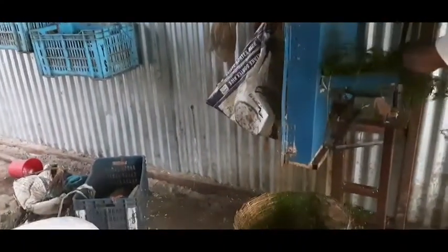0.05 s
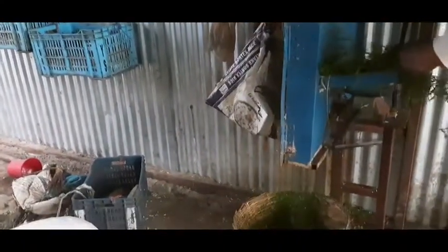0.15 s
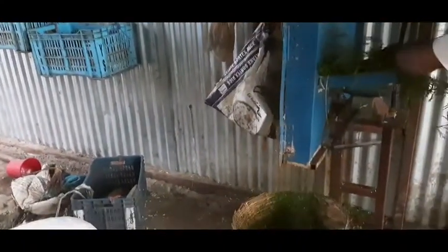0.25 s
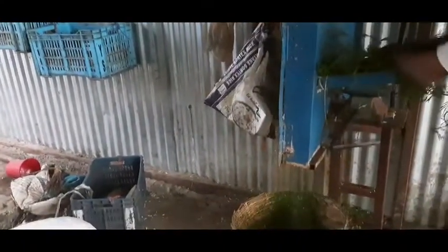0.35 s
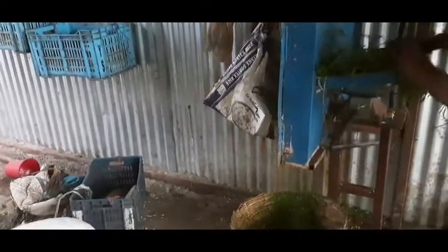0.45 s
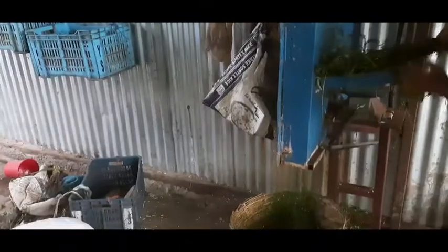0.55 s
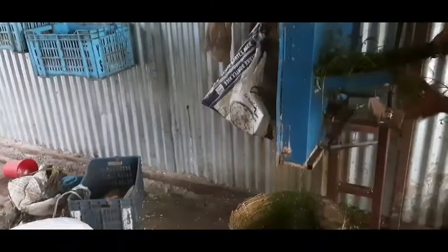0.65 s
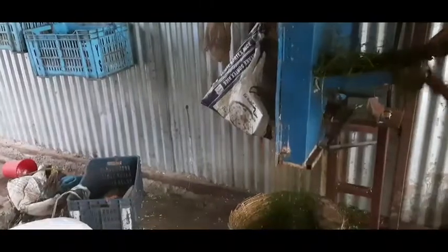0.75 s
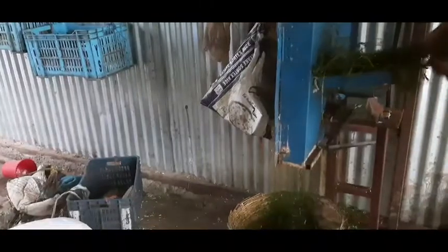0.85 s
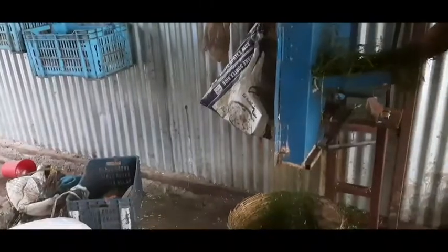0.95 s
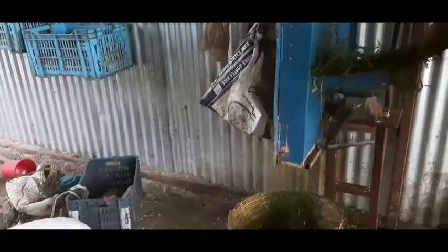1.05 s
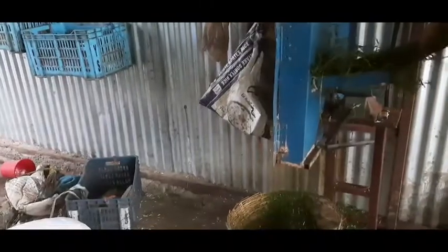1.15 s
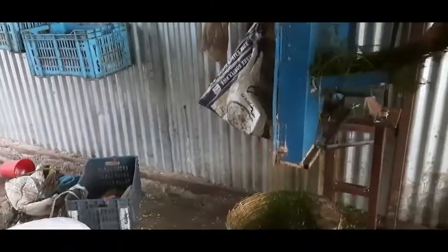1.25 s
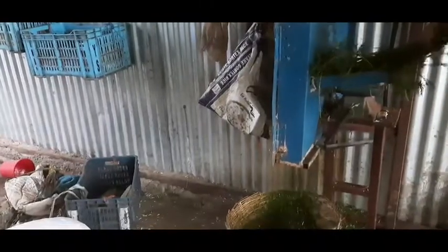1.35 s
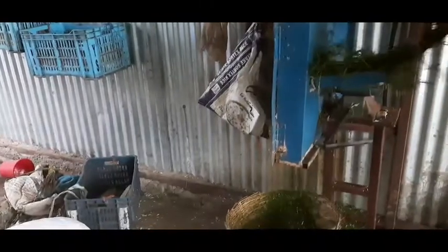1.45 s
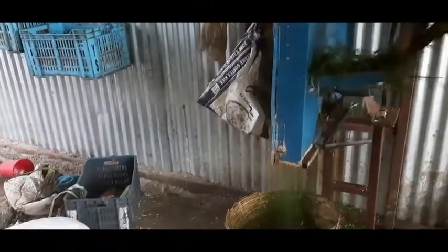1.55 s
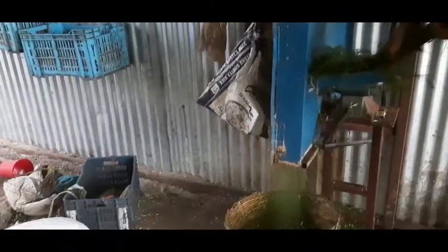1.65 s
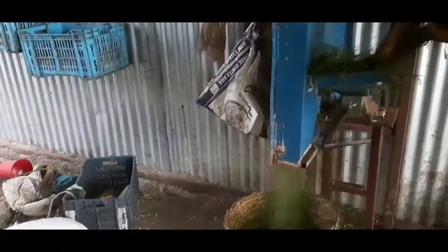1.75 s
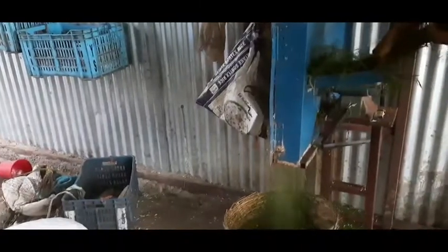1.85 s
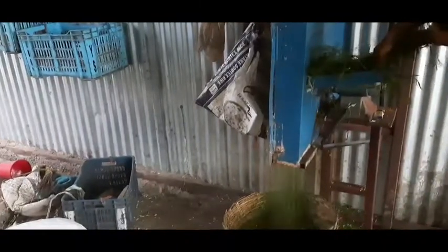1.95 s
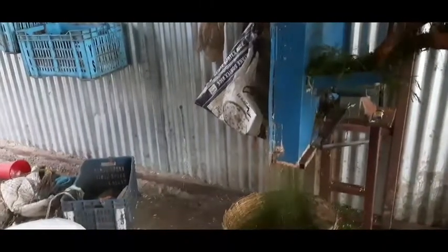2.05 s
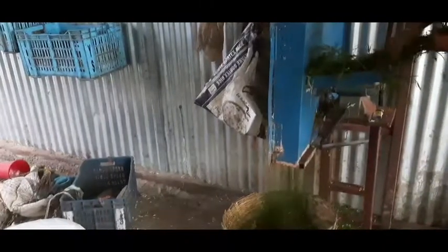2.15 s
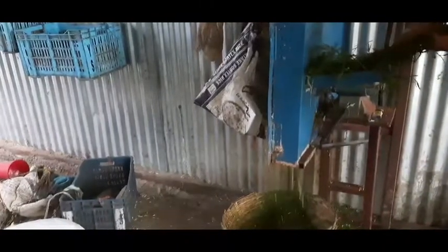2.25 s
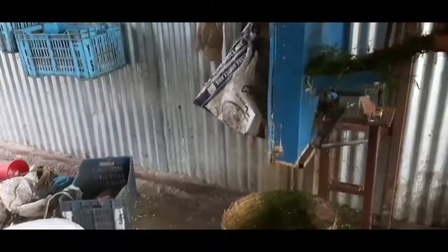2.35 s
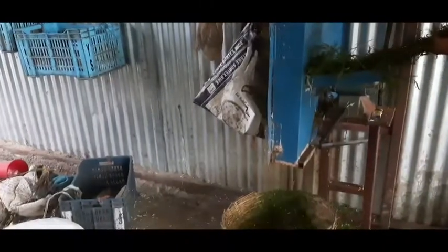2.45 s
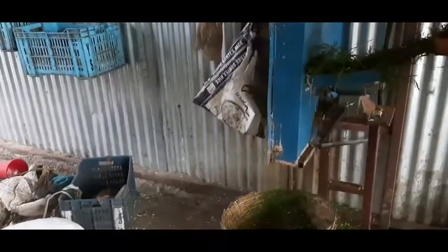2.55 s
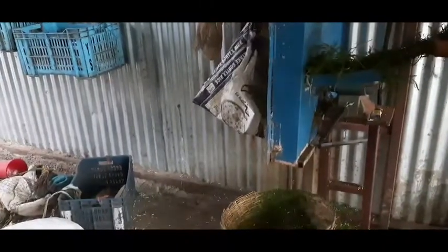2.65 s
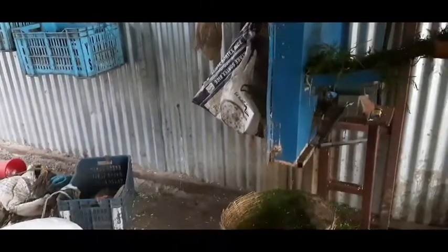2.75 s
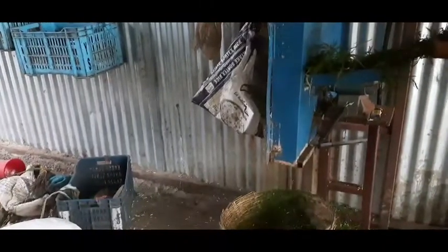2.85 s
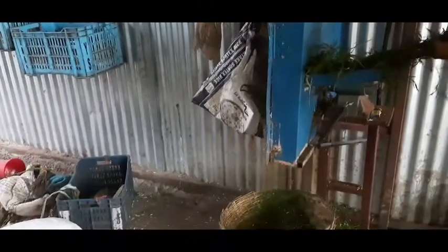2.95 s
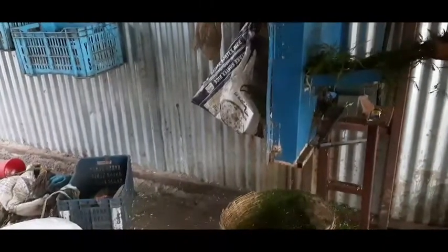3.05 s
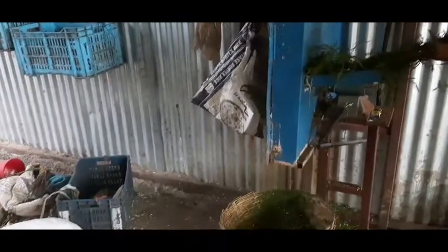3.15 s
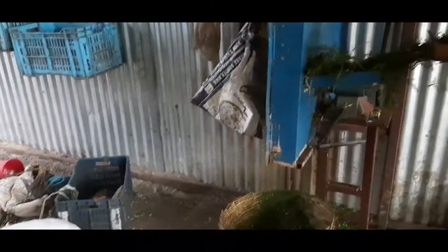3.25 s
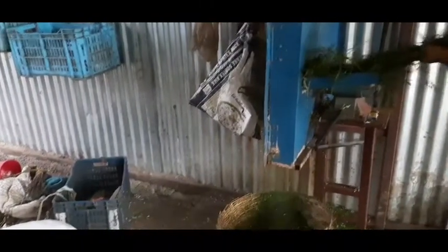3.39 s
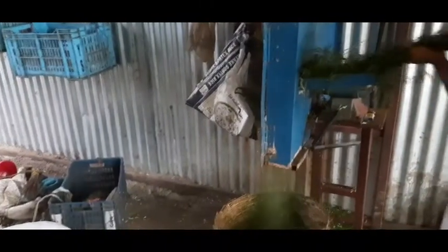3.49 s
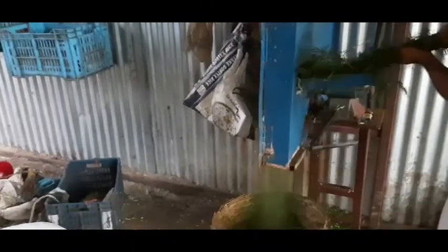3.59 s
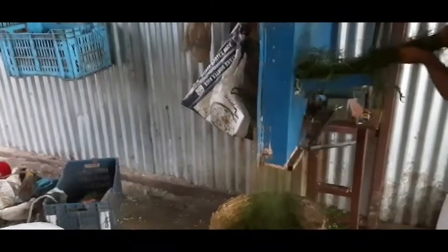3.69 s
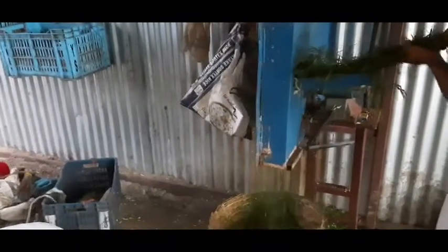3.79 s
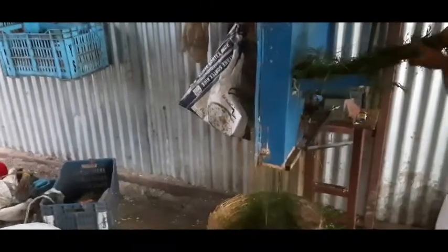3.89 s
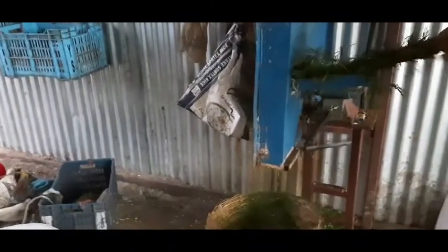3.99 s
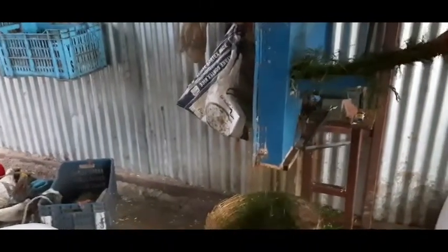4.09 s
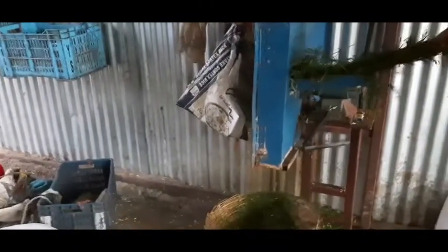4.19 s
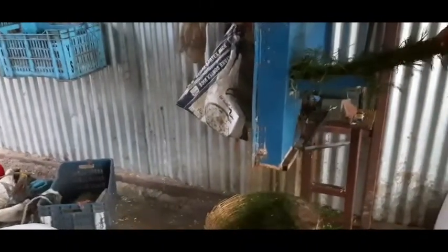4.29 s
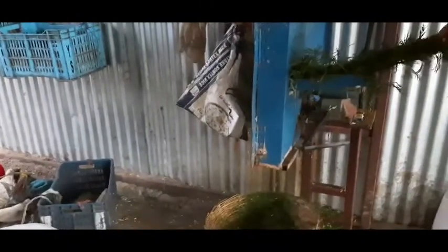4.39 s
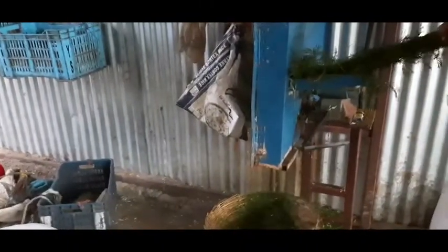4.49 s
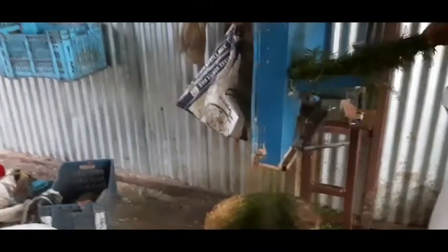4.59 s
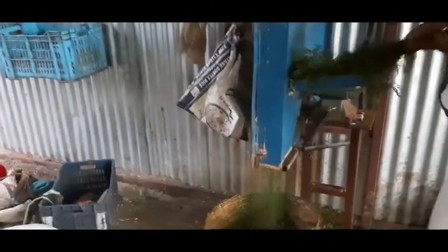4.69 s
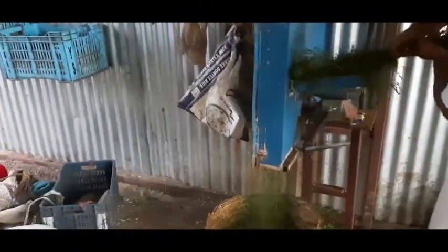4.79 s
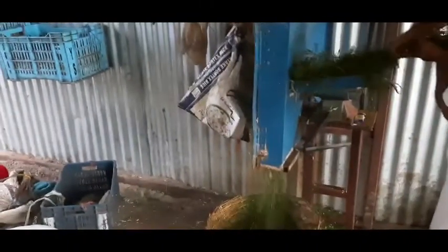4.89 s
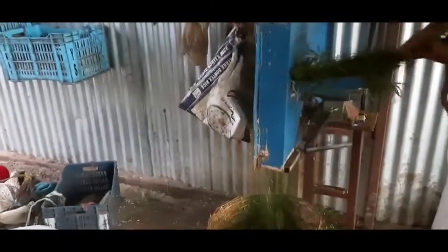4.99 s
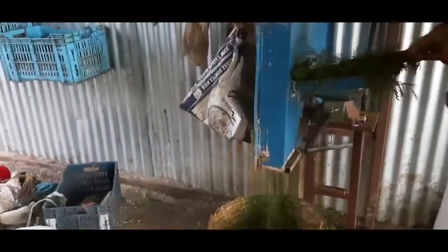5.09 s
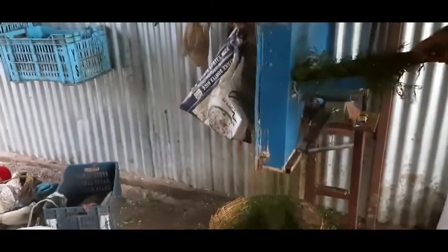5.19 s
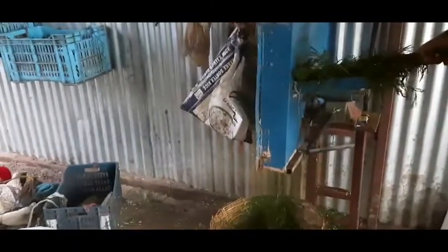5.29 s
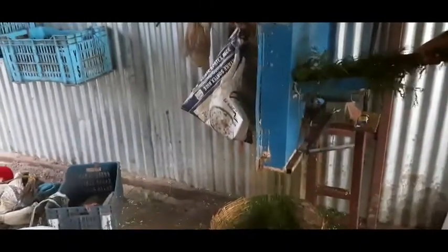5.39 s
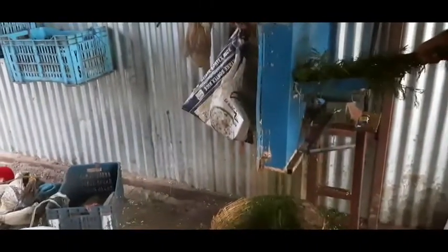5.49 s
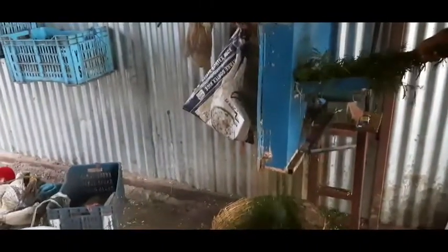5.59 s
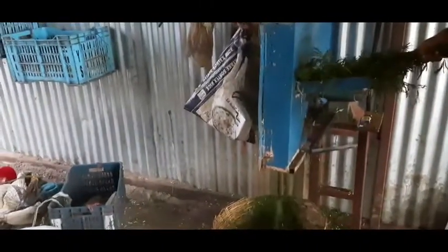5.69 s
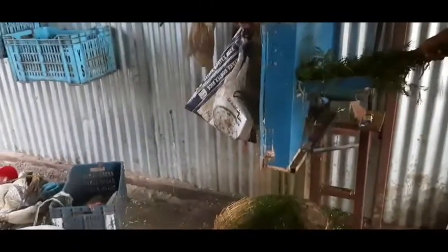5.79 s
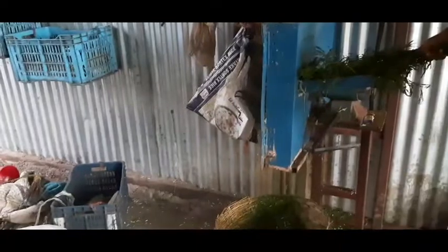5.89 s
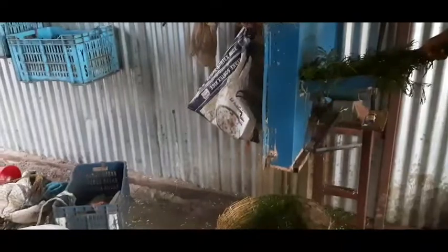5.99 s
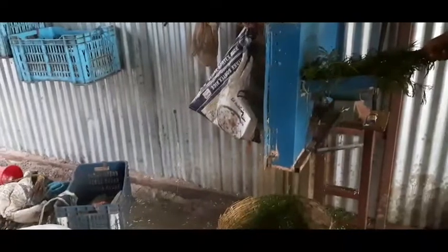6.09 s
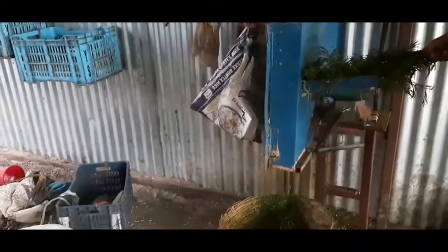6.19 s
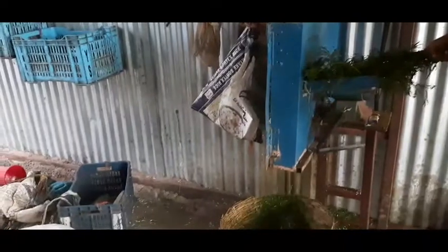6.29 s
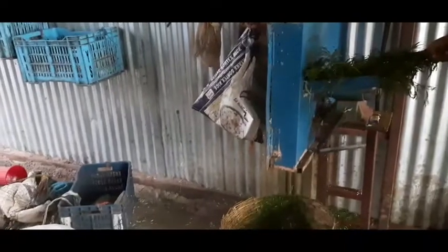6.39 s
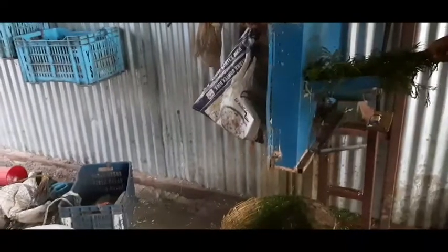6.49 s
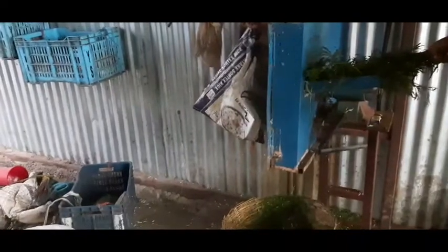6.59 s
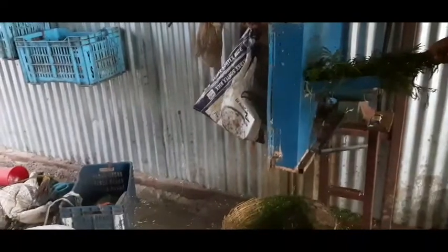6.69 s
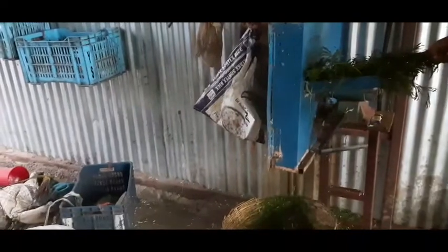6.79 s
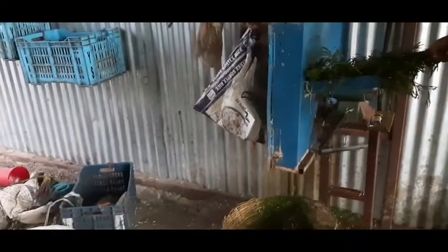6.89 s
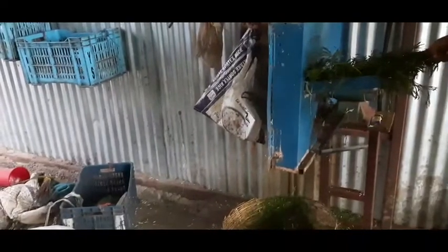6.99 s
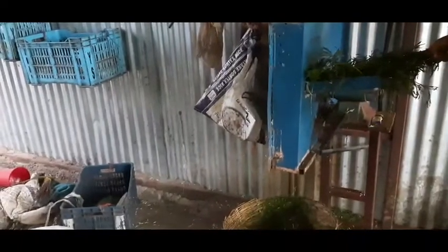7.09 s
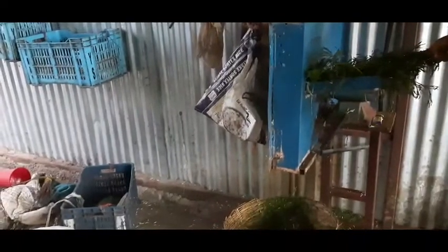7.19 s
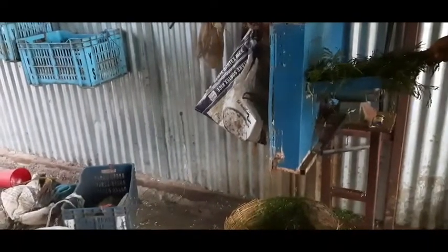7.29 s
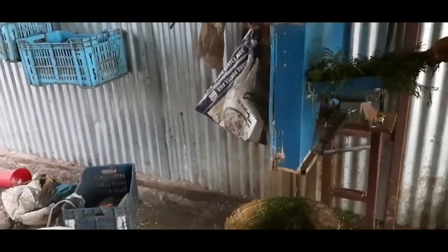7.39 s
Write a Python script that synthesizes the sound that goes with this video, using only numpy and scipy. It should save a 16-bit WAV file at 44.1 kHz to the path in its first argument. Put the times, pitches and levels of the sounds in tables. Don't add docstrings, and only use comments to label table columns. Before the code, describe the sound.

A small electric fodder chopper runs close to a stereo microphone in a reverberant sheet-metal shed. From 0 to 1 s a fast buzzing hum carries dense stalk crackle, metallic clatter and sharp snaps near 0.6 and 0.9. The fan whine comes forward around 1.2, then bites at 1.5-2 drag the pitch down, with low air buffets on the right near 1.7. The rotor recovers from 2.2 to 3.3, whining upward with light grazing ticks and a burst near 2.8. Heavy cracks and knocks at 3.3-3.6 pull it down again; it climbs quietly until 4.55. Another hard bite at 4.6-4.9 makes it sag into rough, slowing chops, nearly stalling about 5.5 with small snaps and faint steel pings to 5.7. From 5.8 it slowly spins up, quiet at first; by 6.7-7.45 hum and fan whine swell, with small ticks.

```python
import sys
import numpy as np
from scipy import signal
from scipy.fft import rfft, irfft, next_fast_len
from scipy.io import wavfile
from scipy.ndimage import uniform_filter1d, map_coordinates

SR = 44100
rng = np.random.default_rng(int(sys.argv[2]) if len(sys.argv) > 2 else 0)


def ratio_of_db(decibels):
    return 10 ** (np.asarray(decibels, float) / 20)


def store_pcm(level_fs):
    pcm = np.round(np.clip(level_fs, -1, 1) * 32767).astype(np.int16)
    wavfile.write(sys.argv[1], SR, np.atleast_2d(pcm).T)


N = 328411
TICK = 64


def unit(x):
    return x / np.sqrt(np.mean(x ** 2) + 1e-20)


def noise():
    return rng.standard_normal((2, N))


def ticks():
    return np.arange(0, N + TICK, step=TICK) / SR


def full(control):
    return np.interp(np.arange(N) / SR, ticks(), control)


def curves(rows):
    seconds, *columns = np.transpose(rows)
    return [np.interp(ticks(), seconds, column) for column in columns]


def wobble(rate):
    knots = rng.standard_normal(int(N * rate / SR) + 4)
    return np.interp(ticks() * rate, np.arange(len(knots)), knots)


def along(points, hz):
    f, values = np.transpose(points)
    return np.interp(np.log(hz + 1), np.log(f + 1), values)


def filtered(x, response):
    m = next_fast_len(x.shape[-1] + SR // 2)
    spectrum = rfft(x, m) * response(np.fft.rfftfreq(m, 1 / SR))
    return irfft(spectrum, m)[..., :x.shape[-1]]


def ringing(modes, hz):
    total = 0
    for k, (centre, width, db) in enumerate(modes):
        damping = 1j * hz * width
        total = total + (-1) ** k * ratio_of_db(db) * damping / (centre ** 2 - hz ** 2 + damping)
    return total


def power_sum(*levels_db):
    return 10 * np.log10(sum(ratio_of_db(2 * db) for db in levels_db))


def surges(rows, rise):
    t = ticks()
    levels_db = []
    for s, hold, db, fade in rows:
        rising = rise * np.maximum(s - t, 0)
        fading = fade * np.maximum(t - s - hold, 0)
        levels_db.append(db - rising - fading)
    return power_sum(*levels_db, -200)


# time in seconds, shaft speed in turns per second.
SHAFT_SPEED = [(0.0, 47.8), (0.77, 45.6), (1.02, 45.0), (1.48, 46.9), (1.62, 44.6), (1.92, 35.7),
               (2.34, 39.9), (2.74, 43.3), (3.3, 46.4), (3.4, 44.6), (3.76, 32.0), (4.55, 40.8),
               (4.64, 38.2), (5.0, 24.8), (5.51, 14.8), (5.78, 17.4), (6.7, 25.6), (7.45, 33.3)]


def shaft_speed():
    return curves(SHAFT_SPEED)[0]


# time in seconds, hum in dB, rotor rocking in dB, blade mismatch in dB, frame shudder in dB,
# cage buzz in dB, upper hum in dB.
MOTOR_EFFORT = [(0, -36.5, 2.5, 2, -5, -9, -2), (.3, -34, -5.5, 0, 7, 3.5, -1),
                (.95, -33.5, 8.5, 4.5, -2.5, 0.5, 2.5), (1.3, -39.5, -0.5, -3, -10, -2, -0.5),
                (2.12, -47.5, 2.5, 3.5, -3, -2.5, 0.5), (2.45, -46.5, 4, -4, -2, -0.5, 2.5),
                (2.74, -45, 3, -2, 2.5, -8, 0.5), (2.9, -38.5, -1, 2, -9, 0, 0.5),
                (3.11, -42, -4, -3, -12, -7, -2), (3.3, -38.5, -1.5, -3.5, -24, -1, 0),
                (3.98, -56, 11, 5, -7, 2, 0.5), (4.17, -48.5, 10, -3, 3, 5.5, -2),
                (4.45, -49.5, 4, -6.5, 4, 1.5, 2), (5.58, -59, -9, 10.5, -3, -1, 1),
                (6.04, -59, 6, 7.5, 5, -2, -2.5), (6.62, -48.5, 8, -0.5, 1, 0, -1),
                (7.05, -38, 9.5, -0.5, -1.5, -1.5, -2), (7.45, -35.5, 3, 0, -9, 2.5, -3)]


def motor_effort():
    return curves(MOTOR_EFFORT)


def drag():
    speed = shaft_speed()
    lag_s = 0.15
    keep = np.exp(-TICK / (lag_s * SR))
    slowing = np.maximum(-np.gradient(speed, ticks()) - 5, 0)
    braking = signal.lfilter([1 - keep], [1, -keep], slowing)
    labouring = np.maximum(30 - speed, 0) / 19
    return full(np.clip(0.045 + 0.038 * braking + labouring, 0, 0.8))


def blade_gate(turns, life_s, steady, scatter_db, weak_db):
    passes = (2 * turns).astype(int)
    since_s = (2 * turns - passes) / (2 * full(shaft_speed()))
    scatter = np.clip(rng.standard_normal(N // 100), -2, 1.6)
    second_blade = np.arange(N // 100) % 2
    size_db = scatter_db * scatter + weak_db * second_blade
    return steady + ratio_of_db(size_db)[passes] * np.exp(-since_s / life_s)


# time of full level in seconds, hold in seconds, crackle in dB, fade in dB per second,
# sheet-metal clatter against the crackle in dB.
BITES = [(0, 0.071, -43, 92, -4), (0.1, 0.61, -46, 100, 3.5), (0.404, 0.034, -43, 200, 3),
         (0.56, 0.12, -46, 56, 8), (0.787, 0.046, -41, 81, 5), (0.938, 0.037, -41, 83, 7.5),
         (1.276, 0.048, -54.5, 150, 2.5), (1.499, 0.025, -38, 50, 3.5), (1.633, 0.1, -40, 64, -1.5),
         (1.821, 0.028, -39.5, 153, 8), (2.03, 0.087, -49, 197, 5), (2.19, 1.6, -57.5, 100, -10),
         (2.806, 0.083, -52.5, 112, 2.5), (3.349, 0.13, -41, 73, 4), (3.555, 0.078, -42, 185, 9),
         (4.621, 0.15, -40, 80, 9), (4.846, 0.04, -46.5, 128, 5), (4.93, 0.026, -55.5, 64, -11),
         (5.05, .1, -67, 100, -10), (5.584, 0.027, -74.5, 100, 0), (5.139, .01, -60, 240, 14.5),
         (5.242, .01, -54, 120, -10), (5.295, 0.053, -59, 308, 2), (5.676, 0.012, -61, 103, 4),
         (6.667, 0.34, -66, 30, 6.5), (1.046, 0.04, -56, 97, 16.5)]


def feed(extra_db):
    rows = []
    for (s, hold, db, fade, _), more in zip(BITES, extra_db):
        rows.append((s, hold, db + more, fade))
    loose_chaff_db = motor_effort()[0] - 25.5
    return power_sum(surges(rows, 367), loose_chaff_db)


# frequency in Hz, width in Hz, level in dB.
HOUSING = [(79.2, 17.2, -5.5), (127, 12, -9.5), (178.1, 11.5, -0.5), (214.3, 8, -8), (254, 26, -2),
           (302, 27, -4.5), (358.1, 20.2, 3), (401.7, 26.7, 2), (467, 43, -1.5), (643, 37, -2),
           (700, 42, -1.5), (866, 36, -2.5), (1030, 40, -6)]


def housing(hz):
    return ringing(HOUSING, hz)


# frequency in Hz, width in Hz, level in dB.
SHEET = [(1024, 44, -3), (1252, 180, -9.5), (1483, 164, -2), (1557, 30, 6.5), (1794, 60, -1),
         (1876, 17, 1.5), (2250, 28, -5), (2496, 20.4, 1)]


def sheet_metal(hz):
    return ringing(SHEET, hz)


# frequency in Hz, time to fade by 60 dB in seconds.
SHED_FADE = [(200, 0.56), (2000, 0.42), (8000, 0.17), (16000, 0.037)]


def shed(pair, wet_db):
    hz, t, z = signal.stft(pair[0], SR, nperseg=256)
    keep = ratio_of_db(-120 * t[1] / along(SHED_FADE, hz))
    power = np.array([signal.lfilter([0, 1 - k], [1, -k], p) for k, p in zip(keep, np.abs(z) ** 2)])
    fresh = signal.stft(rng.standard_normal(pair.shape), SR, nperseg=256)[2]
    lingering = unit(np.abs(fresh)) * np.exp(1j * np.angle(fresh)) * np.sqrt(power)
    tail = signal.istft(lingering, SR, nperseg=256)[1]
    return (pair + ratio_of_db(wet_db) * tail[:, :N]) / np.sqrt(1 + ratio_of_db(2 * wet_db))


# frequency in Hz, level in dB.
ROOM_TONE = [(1500, -30), (2500, 2), (5800, -4), (7200, 3), (8200, -21), (15000, -3.5)]


def room_tone():
    return ratio_of_db(-78.0) * unit(filtered(noise(), lambda hz: ratio_of_db(along(ROOM_TONE, hz))))


# time of full level in seconds, hold in seconds, buffet in dB, fade in dB per second.
PUFFS = [(0, 0.0075, -66, 250), (.5, .01, -75, 130), (.89, 0.16, -74, 70), (1.66, .02, -42.5, 140),
         (1.79, 0.012, -45.5, 260), (3.36, .03, -51, 100), (3.45, .02, -43.5, 122), (3.56, .01, -56, 450),
         (3.85, .6, -76, 40), (4.62, .01, -66, 120), (4.85, .08, -66, 150), (5.8, .2, -79, 40),
         (6.95, .15, -67, 50), (7.4, .05, -70, 50)]
# frequency in Hz, level in dB per Hz.
BUFFET_TONE = [(13, -48), (22, -30), (41, -21), (59, -2), (100, -7), (140, -10), (180, -27), (310, -120)]


def gusts():
    buffet = unit(filtered(noise(), lambda hz: ratio_of_db(along(BUFFET_TONE, hz))))
    draught_db = motor_effort()[0] - 42 + 4 * wobble(9.8)
    still_air_db = -83
    level_db = power_sum(surges(PUFFS, 450), draught_db, still_air_db)
    left_right_db = np.array([[-7], [4.5]])
    return full(ratio_of_db(level_db)) * ratio_of_db(left_right_db) * buffet


# time in seconds, level in dB.
FAN_LEVEL = [(0, -63), (1.2, -51), (1.45, -52), (2.2, -64), (2.5, -56), (3, -56.5), (3.3, -49.5),
             (3.85, -65), (4.2, -58), (4.55, -56), (5.3, -83), (5.9, -90.5), (6.3, -77), (6.7, -63),
             (7, -54), (7.12, -50.5), (7.25, -49.5), (7.45, -48)]
# cycles per shaft turn, level in dB.
VANES = [(25, -23), (40, -19), (60, -15.5), (80, -4), (108, -3.5), (114, -16), (125, -16), (160, -120)]
# frequency in Hz, level in dB.
COWL = [(500, -6), (1200, 3.5), (1600, 8.5), (2100, 0), (2700, 4), (3300, -3.5), (4500, -2), (6000, 7.5)]


def fan(turns):
    steps = 1024
    count = next_fast_len(int(turns[-1] * steps) + steps)
    order = np.fft.rfftfreq(count, 1 / steps)
    air = irfft(rfft(rng.standard_normal((2, count))) * ratio_of_db(along(VANES, order)), count)
    pair = np.array([map_coordinates(channel, [turns * steps], order=1) for channel in air])
    pair = unit(pair * (1 + 0.054 * np.sin(2 * np.pi * turns)))
    level_db = curves(FAN_LEVEL)[0] + wobble(11)
    return full(ratio_of_db(level_db)) * filtered(pair, lambda hz: ratio_of_db(along(COWL, hz)))


# time in seconds, level in dB.
CLINKS = [
    (5.5815, -68),
    (5.7122, -63),
]
# frequency in Hz, level in dB, time to fade by 60 dB in seconds.
STEEL_PIN = [(2480, -4, 0.22), (3600, -5, .2), (4662, -6, .2), (5840, 4, .2), (7305, -6, .15),
             (8629, -6, .12)]


def clinks():
    out = np.zeros(N + SR)
    t = np.arange(SR // 4) / SR
    for s, db in CLINKS:
        start = round(s * SR)
        for hz, level_db, t60 in STEEL_PIN:
            waver_db = 3.0 * wobble(40)[:len(t) // TICK + 1].repeat(TICK)[:len(t)]
            tone_db = db + level_db + rng.normal(0, 2) - 60 * t / t60 + waver_db
            out[start:start + len(t)] += ratio_of_db(tone_db) * np.sin(2 * np.pi * hz * t)
    return out[:N] * [[1], [0.6]]


def clatter(turns):
    level_db = feed([row[-1] for row in BITES])
    level_db = uniform_filter1d(level_db, size=SR // 28 // TICK)
    passes = np.arange(1, int(2 * turns[-1]))
    second_blade = passes % 2
    at = np.interp(passes / 2 + 0.012 * second_blade, turns, np.arange(N))
    at = at + 0.6 * rng.standard_normal(len(passes))
    size = ratio_of_db(1.3 * rng.standard_normal(len(passes)) - 6 * second_blade)
    whole, part = at.astype(int), at % 1
    blows = np.bincount(whole, size * (1 - part), N + 2)
    blows = blows + np.bincount(whole + 1, size * part, N + 2)

    def panels(hz):
        return sheet_metal(hz) * hz ** 4 / (hz ** 4 + 440.0 ** 4)

    regular = unit(filtered(blows[:N], panels)) * [[1], [0.6]]
    tearing = unit(filtered(blade_gate(turns, 0.0092, 0.21, 2.0, -0.81) * noise(), panels))
    share = np.clip(0.04 + drag(), 0, 1)
    return full(ratio_of_db(level_db - 5.0)) * (np.sqrt(1 - share) * regular + np.sqrt(share) * tearing)


# time in seconds, peak in dB, knock against the peak in dB.
SNAPS = [(0.6035, -34, -7), (0.626, -24, -4), (0.912, -23.5, -19), (0.9345, -26.5, -11),
         (1.479, -22.5, -13), (1.996, -32, 0), (2.1698, -33.5, -14), (2.8787, -31.5, -8), (3.2998, -27, -6),
         (3.321, -25, 3), (3.51, -21, -8), (4.547, -38, -4), (4.572, -26, 7), (4.5984, -25, -11),
         (4.8703, -23, 7), (5.13, -38, 1), (5.233, -27, 0.5), (5.656, -34, 4), (5.7132, -42, -4),
         (6.1609, -59, -10), (4.535, -52, -10), (6.3759, -55, -6), (6.5595, -52, -6), (7.012, -50, -1),
         (7.0454, -53, -1), (7.0825, -50, -6), (7.1167, -59, -6), (7.1771, -61, -8), (7.2669, -55, -3),
         (7.3367, -42, 10)]
# time in seconds, peak in dB.
GRAZES = [(0.409, -32), (0.7574, -31), (0.9804, -39), (1.8282, -31), (1.8552, -40), (2.0218, -47),
          (2.0497, -51), (2.4089, -48), (2.7656, -36), (2.7884, -42), (2.8104, -43), (2.8335, -37),
          (2.8564, -32), (2.9018, -30), (2.9244, -37), (3.0056, -49), (3.028, -48), (3.05, -49),
          (3.0724, -47), (3.0944, -46), (3.1168, -46), (3.1384, -45), (4.0791, -56), (5.0469, -53),
          (5.1726, -50), (6.4767, -60), (6.6233, -57), (6.7226, -50), (6.8867, -46)]
# frequency in Hz, level in dB.
CRACKLE_TONE = [(300, -33), (700, -13), (1000, -1.5), (2000, 2), (3100, 1), (4300, 1.5), (8000, -2.5),
                (12600, -2), (14900, -6), (16000, -3)]
# frequency in Hz, level in dB.
KNOCK_TONE = [(150, -24), (230, -28), (300, 10), (520, -6), (900, 6.5), (1300, 4), (2500, -22)]


def cutting(turns):
    gate = blade_gate(turns, 0.003, 0.36, 3.4, -6)
    fibres = ratio_of_db(4.1 * np.minimum(rng.exponential(size=N), 4.5))
    crackle = full(ratio_of_db(feed(np.zeros(len(BITES))) + 6.5)) * unit(gate * fibres * noise())

    t = np.arange(SR // 10) / SR
    knocks = np.zeros(N)
    snaps = np.zeros((2, N + len(t)))
    for s, db, knock_db in SNAPS:
        start = round(s * SR)
        slow_part = ratio_of_db(db - 3.5 - 60 * t / 0.046)
        sharp_part = ratio_of_db(db - 10.5 - 60 * t / 0.0047)
        snaps[:, start:start + len(t)] += (slow_part + sharp_part) * rng.standard_normal((2, len(t)))
        knocks[start] = ratio_of_db(db + knock_db + 29)
    for s, db in GRAZES:
        start = round(s * SR)
        scrape = np.diff(rng.standard_normal((2, len(t) + 2)), 2)
        snaps[:, start:start + len(t)] += ratio_of_db(db - 7 - 60 * t / 0.045) * scrape

    def struck(hz):
        clang = ratio_of_db(-6.5) * sheet_metal(hz)
        return housing(hz) * ratio_of_db(along(KNOCK_TONE, hz)) + clang

    thud = filtered(knocks, struck) * [[1], [0.3]]
    return filtered(crackle + snaps[:, :N], lambda hz: ratio_of_db(along(CRACKLE_TONE, hz))) + thud


# time of full level in seconds, hold in seconds, hum in dB, fade in dB per second,
# rocking of the low orders in dB.
HEAVES = [(0.295, 0.042, -40.5, 37, 6), (0.684, .12, -35, 32, -5), (1.44, .03, -41, 60, -3),
          (1.523, .11, -33.5, 92, 4.5), (1.727, .03, -33, 150, -3), (1.836, 0.072, -32, 123, -7),
          (2.83, .12, -44, 70, -4), (3.362, .08, -33, 90, 0), (3.516, 0.0089, -35.5, 200, 2),
          (3.587, 0.081, -31, 170, -4.5), (3.757, 0.018, -48, 53, 5.5), (4.628, .04, -32.5, 40, -12),
          (4.694, 0.018, -33, 90, -13), (4.79, 0.093, -33, 87, 4), (5.135, 0.018, -42, 108, -8),
          (5.245, .01, -49, 94, -4), (5.353, .02, -53, 143, -2), (5.467, 0.047, -64, 96, 6),
          (5.677, .01, -50.5, 100, -10), (6.69, 0.035, -46.5, 42, -7), (7.086, 0.024, -38, 63, -13)]
# shaft order (cycles per turn), level in dB.
ROTOR = [(2, -3), (3, 2.5), (4, 3.5), (5, -3.5), (6, 8.5), (7, -1), (8, 8.5), (9, 1), (10, 8.5), (11, -9),
         (12, 8), (13, -9), (14, 8), (15, -6), (16, 6.5), (17, -3.5), (18, 4.5), (19, 2.5), (20, 4.5),
         (21, -14), (22, 2.5), (23, 3), (24, -13), (25, -2.5), (26, -4)]
# frequency in Hz, level in dB.
PUSH_TONE = [(50, -7.5), (90, -10), (130, -3), (300, -2.5), (1200, -5.5), (2000, -16), (3500, -44)]


def hum(turns):
    free_db, fourth_db, odd_db, sixth_db, tenth_db, bright_db = motor_effort()
    heave_rise = 218
    heave_db = surges([row[:-1] for row in HEAVES], heave_rise)
    rocked_db = surges([(s, hold, db + rock, fade) for s, hold, db, fade, rock in HEAVES], heave_rise)
    level_db = power_sum(free_db, heave_db)
    fourth_db = power_sum(free_db + fourth_db, rocked_db) - level_db
    sixth_db = power_sum(free_db + sixth_db, rocked_db) - level_db
    level_db = level_db + 1.5 * wobble(14)
    speed = shaft_speed()
    upper_db = 0.31 * (speed - 38.7) + bright_db

    lines = np.zeros(N)
    flicker = [wobble(15) for _ in range(4)]
    low_orders_db = {4: fourth_db, 6: sixth_db, 10: tenth_db}
    for order, db in ROTOR:
        above_517_hz_db = upper_db / (1 + (517 / (order * speed)) ** 8)
        load_db = low_orders_db.get(order, above_517_hz_db)
        waver_db = 3 * wobble(4) + 2.5 * flicker[order % 4]
        size = ratio_of_db(db + load_db + odd_db * (order % 2) + waver_db)
        drift = -0.06 * (order - 8) ** 2 + 0.9 * full(wobble(3))
        lines += full(size) * np.cos(2 * np.pi * order * turns + drift)
    lines = filtered(lines, lambda hz: np.abs(housing(hz)) ** 1.28 * ratio_of_db(along(PUSH_TONE, hz)))
    lines /= np.sqrt(np.abs(uniform_filter1d(lines ** 2, size=SR // 6)))

    rough = blade_gate(turns, 0.01, 0.84, 3.4, -7.5) * noise()
    rough = unit(filtered(rough, lambda hz: housing(hz) * ratio_of_db(along(PUSH_TONE, hz))))
    upper = filtered(rough, lambda hz: hz ** 8 / (hz ** 8 + 470.0 ** 8))
    lower = filtered(rough, lambda hz: (110 < hz) & (hz < 235))
    rough += full(ratio_of_db(1.25 * upper_db) - 1) * upper + full(ratio_of_db(fourth_db - 7.0) - 1) * lower
    share = drag()
    mixed = np.sqrt(1 - share) * lines * [[1], [0.4]] + np.sqrt(share) * rough
    return full(ratio_of_db(level_db - 1.5)) * mixed


# frequency in Hz, left-right likeness from 0 to 1.
ALIKE = [(100, 1), (200, 0.92), (350, 0.98), (700, 0.91), (1400, 0.64), (2500, 0.77), (4000, 0.054),
         (16000, 0)]
# frequency in Hz, left minus right in dB.
LEAN = [(60, 1), (110, -1), (200, -2.5), (380, -2), (700, -2.5), (1290, -2.5), (2380, 1), (4400, -4),
        (8120, -6), (15000, 2.5)]


def ports(pair):
    def mid_side(hz):
        angle = np.arccos(np.clip(along(ALIKE, hz), -1, 1)) / 2
        return np.array([np.cos(angle), np.sin(angle)])

    def place(hz):
        half = np.array([[0.5], [-0.5]])
        delay_s = half * 4.26 / SR
        return ratio_of_db(half * along(LEAN, hz)) * np.exp(-2j * np.pi * hz * delay_s)

    mid, side = filtered(pair, mid_side)
    return filtered(np.array([mid + side, mid - side]), place)


def scene():
    turns = np.cumsum(full(shaft_speed())) / SR
    machine = fan(turns) + shed(clatter(turns) + clinks(), -6.5)
    machine = machine + shed(cutting(turns), 2.5) + hum(turns)
    return room_tone() + gusts() + ports(machine)


def low_pass(x):
    return signal.sosfilt(signal.butter(12, 16720, fs=SR, output="sos"), x)


def record(dry):
    rounded = dry / (1 + np.abs(dry / 0.13) ** 4) ** 0.25
    finished = filtered(rounded, lambda hz: hz < 15700)
    return low_pass(finished)


dry = scene()
out = record(dry)
store_pcm(out)
```